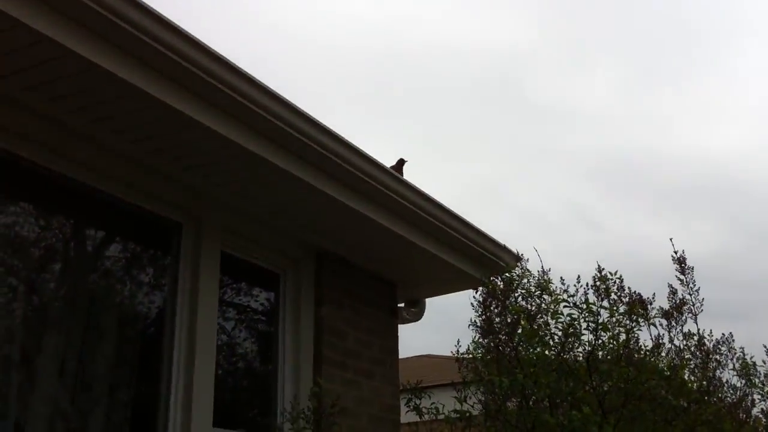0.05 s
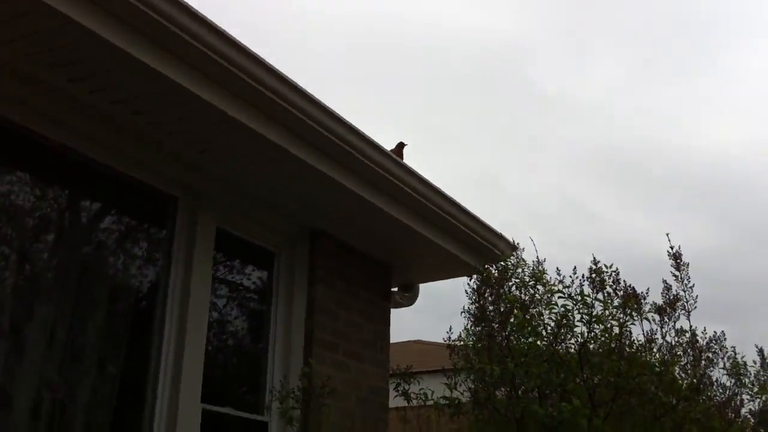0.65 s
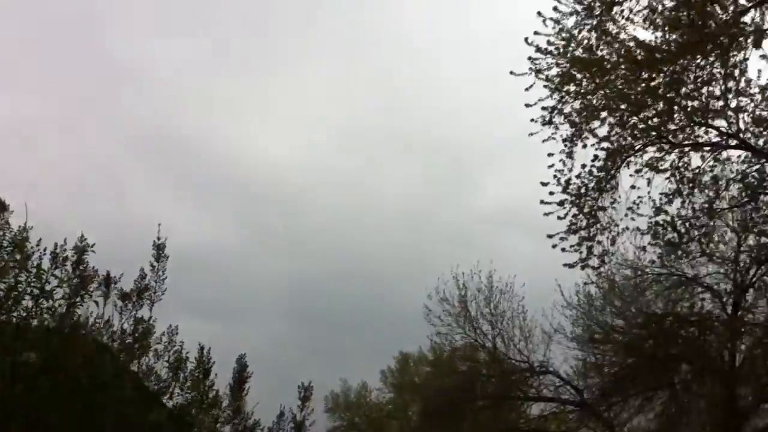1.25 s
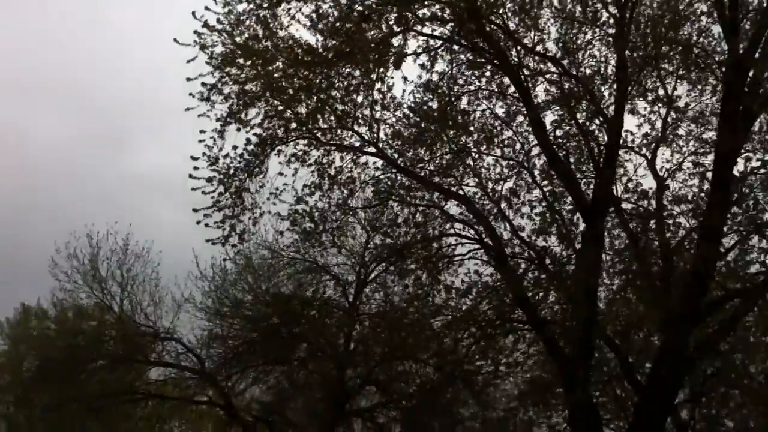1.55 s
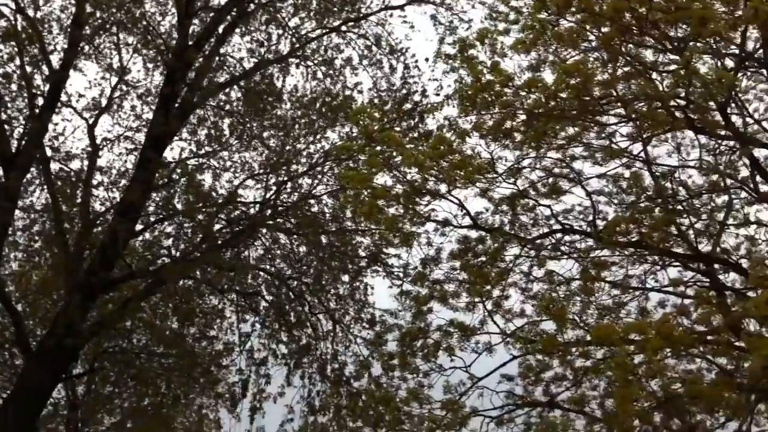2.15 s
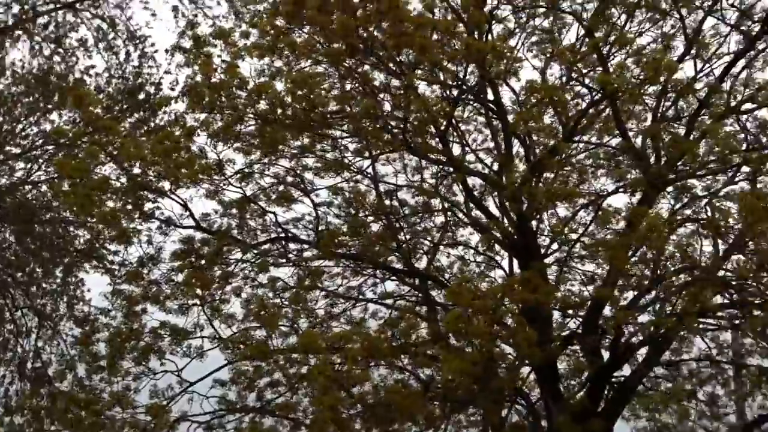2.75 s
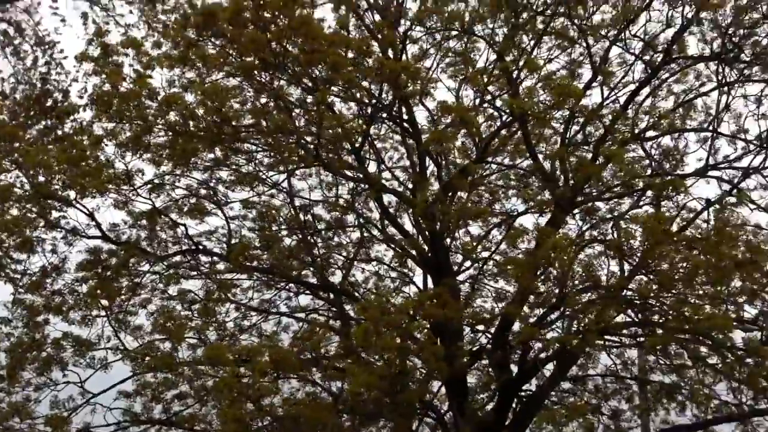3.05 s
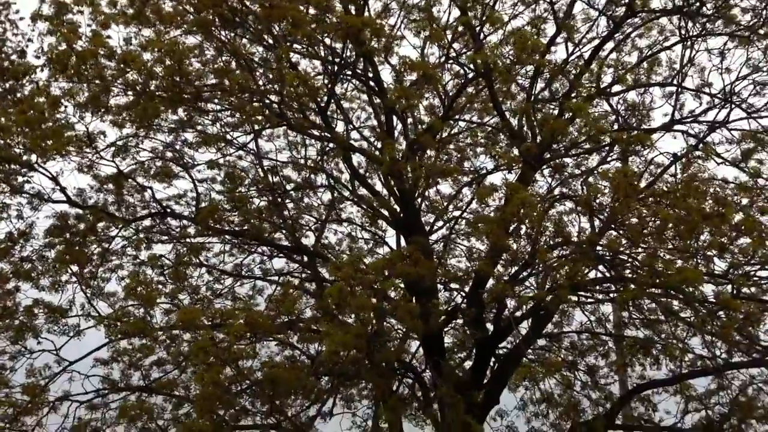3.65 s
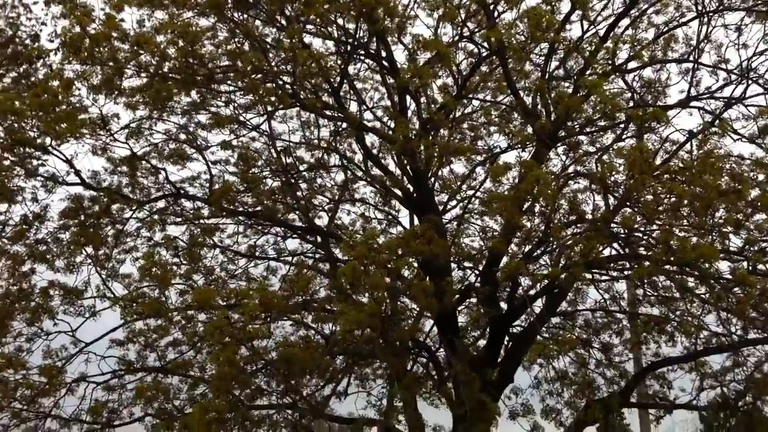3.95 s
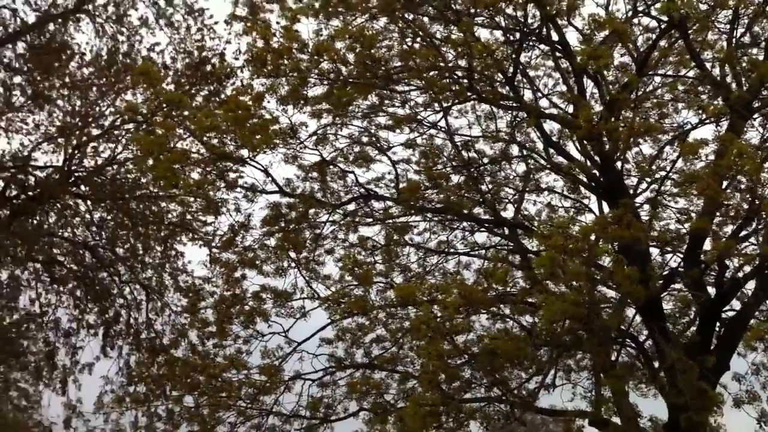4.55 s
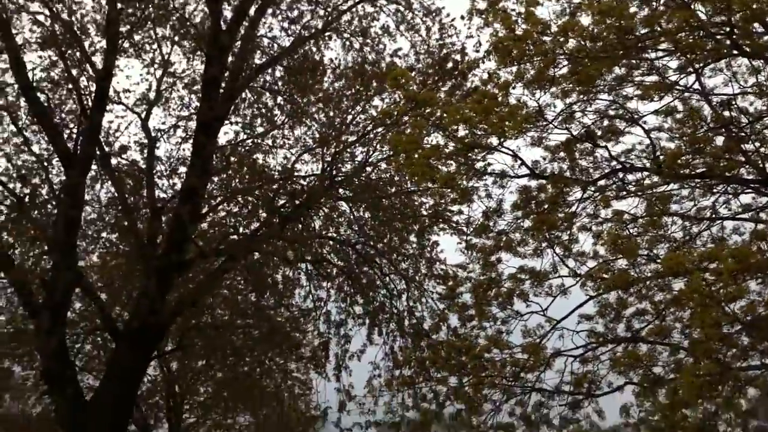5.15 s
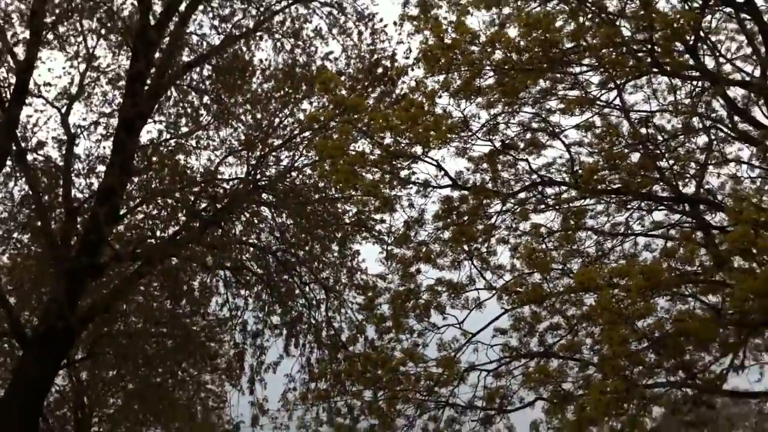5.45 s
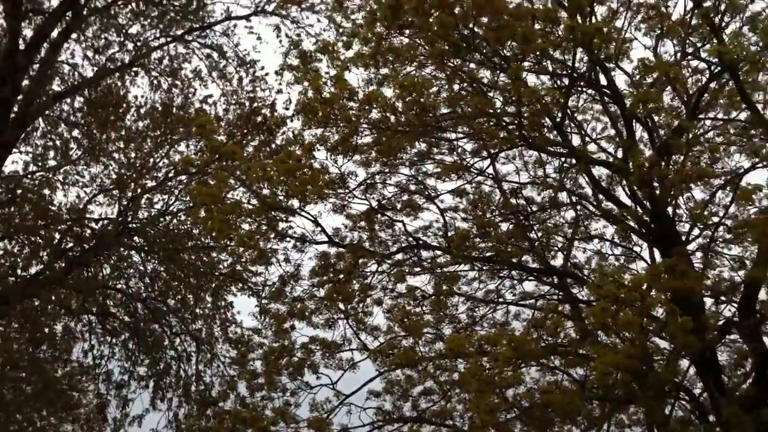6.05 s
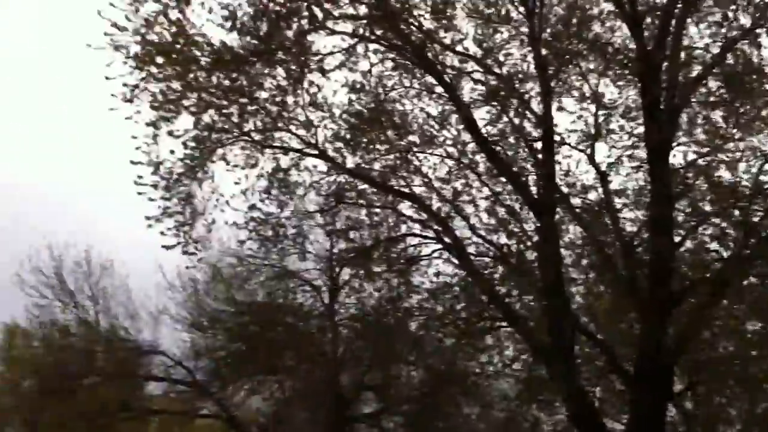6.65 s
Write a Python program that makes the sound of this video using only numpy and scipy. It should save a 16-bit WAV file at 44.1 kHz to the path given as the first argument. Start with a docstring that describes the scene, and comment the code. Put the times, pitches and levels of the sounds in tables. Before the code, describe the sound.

A robin repeats sharp alarm chirps outdoors while its higher-pitched mate answers from further off, over faint distant traffic.

```python
"""Robins scolding near their nest

One robin calls from a roof edge, its higher-pitched mate further off, a third far away in the trees.
The two sides of the syrinx sound together: each 'peek' starts with a rasp, sweeps up, holds, flicks and
drops, and soft clucks come in between. Walls and trees reflect the calls. Distant traffic washes behind,
a car draws nearer, and a finger ticks on the body of a hand-held camera."""
import sys
import numpy as np
from scipy import signal
from scipy.fft import rfft, irfft
from scipy.io import wavfile
from scipy.ndimage import uniform_filter1d

SR = 44100
rng = np.random.default_rng(int(sys.argv[2]) if len(sys.argv) > 2 else 0)


def transcribe(u):
    """Save the signal u as a 16-bit wav file named by the first command-line argument.

    u: samples, shape (n,) or (channels, n), limited to [-1, 1]; the rate is SR.
    q: integer samples, one column per channel.
    """
    v = np.clip(np.atleast_2d(u).T, -1, 1)
    q = np.round(v * 32767).astype(np.int16)
    wavfile.write(sys.argv[1], SR, q)


N = 303849

# spectrum of the outdoor wash: (frequency [Hz], relative density [dB])
WASH_SPECTRUM = [(22, -38), (42, -27), (65, -18), (120, -2), (190, 1), (350, -2.5), (850, 1.5), (1150, -2),
                 (1550, -8.5), (2050, -17), (2600, -23), (4000, -25), (7000, -32), (15500, -36)]
# droning bands of the traffic: (centre [Hz], width [Hz], level [dB])
DRONE_BANDS = [(158, 38, -73), (203.8, 9.1, -71.5), (860, 220, -68.5)]
# tyre whine of an approaching car: (time [s], level [dB])
TYRE_LEVELS = [(0, -70), (2.5, -70), (4.3, -58), (4.9, -54), (5.8, -54.5), (6.403, -52.5), (6.89, -55)]
# finger impacts: (time [s], level [dB])
FINGER_TICKS = [(1.123, -32.5), (1.133, -31), (1.153, -40)]
# modes of the camera body: (frequency [Hz], relative level [dB], decay time T60 [s])
BODY_MODES = [(1120, 8, 0.0084), (1760, 1, 0.019), (2500, -18, .007), (4200, -10, .005)]
# reflections from eaves, wall and ground, for two perches: (delay [s], gain [dB])
ROOF_REFLECTIONS = [(.0032, -23), (.0068, -23), (.0115, -23)]
MATE_REFLECTIONS = [(.0045, -17), (.018, -8), (.026, -17)]
# spectrum of the rasp with the beak open: (frequency [Hz], relative density [dB])
RASP_SPECTRUM = [(1200, -14), (2500, -1.5), (4700, 11.5), (7000, 5), (9500, -7), (12500, 2.5), (15500, -14)]
# overtones and combination tones of the two voices: (difference [dB], 2 x lower [dB], 3 x lower [dB],
# sum [dB], 2 x upper [dB], upper + difference [dB], lower + sum [dB])
CLUCK_PARTIALS = (-28, -32, -37, -42, -26, -30, -28)
MATE_PARTIALS = (-24.5, -26.5, -32, -9.5, -25, -51, -30)
ROOF_PARTIALS = (-21.5, -22, -17.5, -15, -16, -24.5, -20)
# vocal gesture of a peek: (stop time [s], glide() settings of each voice [Hz, s],
# effort() settings of each voice and of the rasp [dB, s])
MATE_GESTURE = dict( stop_s=.084, low_pitch=dict(top_hz=4258, rise_s=.033, sag_hz=34.6, sag_s=0.038),
                high_pitch=dict(top_hz=7130, rise_s=.033, sag_hz=136, sag_s=0.0284),
                low_level=dict(peak_db=2, attack_s=0.037, swell_db=20, fade_db=8.5, fade_s=0.029, bite_db=-8.5, snap_db=10),
                high_level=dict(peak_db=-8.5, attack_s=0.033, swell_db=8, fade_db=10.5, fade_s=0.039, bite_db=0.5, snap_db=1),
                rasp_level=dict(peak_db=-13.5, attack_s=0.033, swell_db=44, fade_db=27, fade_s=0.013, bite_db=4, snap_db=16))
ROOF_GESTURE = dict( stop_s=.079, low_pitch=dict(top_hz=3935, rise_s=.037, sag_hz=182.7, sag_s=0.0163),
                high_pitch=dict(top_hz=6437, rise_s=.033, sag_hz=368, sag_s=.047),
                low_level=dict(peak_db=-3.5, attack_s=0.056, swell_db=31, fade_db=10.5, fade_s=0.031, bite_db=2, snap_db=0.5),
                high_level=dict(peak_db=-13, attack_s=0.034, swell_db=17.5, fade_db=15.5, fade_s=0.031, bite_db=8.5, snap_db=8),
                rasp_level=dict(peak_db=-12.5, attack_s=0.016, swell_db=-5, fade_db=24, fade_s=0.021, bite_db=-3, snap_db=22.5))
# far peeks, soft clucks, the mate's peeks and the roof bird's peeks:
# (time [s], gain [dB], detuning [cents], length [ratio], brightness [dB])
FAR_CALLS = [(1.175, -59.5, 5, 0.97, -5), (4.725, -68, 88, 0.94, 4.5), (4.865, -59.5, 17, 0.71, -3.5)]
CLUCK_CALLS = [(.626, -59.5, -42, 0.83, -1), (.907, -59, -38, 1.04, -8), (4.328, -60, 55, 0.77, -1),
               (4.551, -60.5, 32, 0.84, -2.5), (4.796, -62, 38, 0.93, -2)]
MATE_CALLS = [(.272, -38.5, 8.5, 1.13, 2), (1.512, -37.5, 3, 1.05, 0.5), (2.385, -36.5, 10, 1.04, -0.5),
              (3.343, -36, -11, 0.97, -3), (3.897, -34.5, 1, 1, 2), (5.628, -37, -9, .97, 1)]
ROOF_CALLS = [(-.150, -29, -10.5, 1.15, -4), (.302, -25.5, 4, 0.98, 2.5), (1.268, -27, -1.5, 1.07, 1.5),
              (1.866, -26.5, -1.5, 1.033, 3.5), (2.468, -26.5, 0, 0.98, 4), (2.942, -27.5, 2, 1.03, 3.5),
              (3.367, -27, -3.5, 0.96, 4.5), (3.758, -26.5, -3.5, 1, 2.5), (5.026, -25, -1.5, 0.93, 2.5),
              (5.449, -29.5, -9.5, 1.04, -1.5), (6.034, -25.5, 0, 1.03, 4)]

FLICK_S, DROP_S, RELEASE_S = .0019, .00553, .019  # time scales of a peek's ending


def gain_of(db):
    """Amplitude ratio: tenfold for every 20 dB."""
    return 10 ** (np.asarray(db) / 20)


def unit_rms(x):
    """Normalisation to a mean power of one."""
    return x / np.sqrt(np.mean(x ** 2) + 1e-20)


def add(mix, start_s, sound):
    """Superposition: a sound joins the mix at start_s, which may be negative."""
    at = round(start_s * SR)
    sound = sound[max(-at, 0):]
    part = mix[max(at, 0):][:len(sound)]
    part += sound[:len(part)]


def noise(length, shape):
    """Spectral shaping: white noise weighted by shape(Hz), at unit rms."""
    white = rfft(rng.standard_normal(length))
    return unit_rms(irfft(white * shape(np.fft.rfftfreq(length, 1 / SR)), length))


def spectrum_gain(points, hz):
    """Interpolation of a (Hz, dB) spectrum over log frequency, as an amplitude."""
    point_hz, db = np.transpose(points)
    return gain_of(np.interp(np.log(hz + 1), np.log(point_hz + 1), db))


def bell(hz, centre_hz, octaves):
    """A Gaussian passband over log frequency."""
    return np.exp(-.5 * (np.log2((hz + 1) / centre_hz) / octaves) ** 2)


def bump(t, centre, width):
    """A Gaussian pulse in time."""
    return np.exp(-((t - centre) / width) ** 2)


def settle(t, from_s, over_s):
    """A Gaussian transition from 0 to 1, starting at from_s."""
    return 1 - bump(np.maximum(t, from_s), from_s, over_s)


def traffic(wash_db=-49, patchy_db=.82, whine_hz=1040, whine_octaves=.15):
    """Incoherent sources sum to noise: a broad wash, droning bands and the tyre whine of one car."""
    wash = gain_of(wash_db) * noise(N, lambda hz: spectrum_gain(WASH_SPECTRUM, hz))
    for centre, width, level_db in DRONE_BANDS:
        wash += gain_of(level_db) * noise(N, lambda hz: 1 / (1 + (2 * (hz - centre) / width) ** 2))
    whine_db = np.interp(np.arange(N) / SR, *np.transpose(TYRE_LEVELS))
    wash += gain_of(whine_db) * noise(N, lambda hz: bell(hz, whine_hz, whine_octaves))
    # the level wavers slightly in patches of frequency and time
    spectra = signal.stft(wash, SR, nperseg=1024, noverlap=768)[2]
    patches = uniform_filter1d(rng.standard_normal(spectra.shape), size=8, axis=0)
    patches = unit_rms(uniform_filter1d(patches, size=16, axis=1))
    return signal.istft(spectra * gain_of(patchy_db * patches), SR, nperseg=1024, noverlap=768)[1][:N]


def finger_ticks(rub_db=-23, rub_t60=.2):
    """Each impact excites the damped modes of the camera body; friction adds a brief rub."""
    out = np.zeros(N)
    t = np.arange(SR // 8) / SR
    ring = sum(gain_of(db - 60 * t / t60) * np.sin(2 * np.pi * hz * t) for hz, db, t60 in BODY_MODES)
    for start_s, db in FINGER_TICKS:
        rub = gain_of(rub_db - 60 * t / rub_t60) * noise(len(t), lambda f: bell(f, 1700, 1.44))
        add(out, start_s, gain_of(db) * (ring / abs(ring).max() + rub))
    return out


def yard(reflections, house_db, trees_db, echo_db, echo_s=.208, dull_hz=5200,
         eaves_db=-6, eaves_hz=2600, eaves_octaves=.44, splash_db=-11, splash_hz=12500):
    """Multipath propagation: the impulse response of direct sound, reflections and diffuse scatter."""
    t = np.arange(round(.8 * SR)) / SR

    def band_energy(tail, width_hz):
        """Energy scaling to that of a unit-gain passband of this width."""
        return tail / np.linalg.norm(tail) * np.sqrt(2 * width_hz / SR)

    def scatter(delay, t60, top_hz):
        """Dense reflections merge into low-passed noise that decays exponentially."""
        decay = (t > delay) * gain_of(-60 * abs(t - delay) / t60)
        diffuse = noise(len(t), lambda f: 1 / np.sqrt(1 + (f / top_hz) ** 4))
        return band_energy(diffuse * decay, top_hz)

    path = gain_of(house_db) * scatter(delay=.0029, t60=.29, top_hz=18000)
    path += gain_of(trees_db) * scatter(delay=.045, t60=1, top_hz=dull_hz)
    # a far house front returns a dull, smeared echo
    slap = np.sinc(2 * dull_hz * (t - echo_s)) * 2 * dull_hz / SR
    path += gain_of(echo_db) * (slap + gain_of(-5) * scatter(echo_s, t60=.18, top_hz=dull_hz))
    # the lowest notes spread widely from the beak and rattle briefly under the eaves
    eaves = noise(len(t), lambda f: bell(f, eaves_hz, eaves_octaves)) * gain_of(-60 * t / .2)
    path += gain_of(eaves_db) * band_energy(eaves, eaves_hz * eaves_octaves)
    # the treble splashes off the roof and the gutter
    splash = noise(len(t), lambda f: bell(f, splash_hz, 1)) * (t > .01) * gain_of(-60 * t / .072)
    path += gain_of(splash_db) * band_energy(splash, splash_hz / 2)
    path[0] += 1  # direct sound
    for delay, db in reflections:
        path[round(delay * rng.uniform(.96, 1.04) * SR)] += gain_of(db)  # the listener moves between calls
    return path


def cluck(length_s=.031, edge_hz=1230, top_hz=1866, voice_ratio=1.661, swell_db=3):
    """Joint frequency and amplitude modulation in one short arch: a cluck's course for syrinx()."""
    t = np.arange(0, length_s, 1 / SR)
    arch = np.sin(np.pi * t / length_s)
    low_hz = edge_hz + (top_hz - edge_hz) * arch
    arch_db = -swell_db * (1 - arch) ** 2
    low_db, high_db, rasp_db = arch_db + 7.5, arch_db + 7, arch_db - 10.5
    return t, low_hz, low_hz * voice_ratio, low_db, high_db, rasp_db, 1 - arch


def glide(t, stop_s, top_hz, rise_s, sag_hz, sag_s, sweep_from=.35, drop_to=.5, flick_share=.066):
    """Frequency modulation of one voice: it sweeps up, sags, flicks up at the stop and drops away."""
    sweep = sweep_from + (1 - sweep_from) * np.sin(np.pi / 2 * np.minimum(t / rise_s, 1))
    sag = sag_hz * settle(t, rise_s, sag_s)
    flick = 1 + flick_share * bump(t, stop_s, FLICK_S)
    drop = drop_to + (1 - drop_to) * np.exp(-np.maximum(t - stop_s, 0) / DROP_S)
    return (top_hz * sweep - sag) * drop * flick


def effort(t, stop_s, peak_db, attack_s, swell_db, fade_db, fade_s, bite_db, snap_db,
           release_db=33.5, accent_s=.0064):
    """Amplitude envelope in dB of a voice or the rasp: swell, fade and release, with two accents."""
    swell = max(swell_db, 0) * np.maximum(1 - t / attack_s, 0) ** 2
    fade = fade_db * settle(t, attack_s, fade_s)
    release = release_db * (np.maximum(t - stop_s, 0) / RELEASE_S) ** 2
    bite = bite_db * bump(t, .015, accent_s)  # during the sweep
    snap = snap_db * bump(t, stop_s + .0083, accent_s)  # during the drop
    return peak_db - swell - fade - release + bite + snap


def peek(stop_s, low_pitch, high_pitch, low_level, high_level, rasp_level):
    """Biphonation, two voices with separate pitches and levels: an alarm call's course for syrinx()."""
    t = np.arange(0, stop_s + RELEASE_S, 1 / SR)
    pitches = [glide(t, stop_s, **rule) for rule in (low_pitch, high_pitch)]
    levels = [effort(t, stop_s, **rule) for rule in (low_level, high_level, rasp_level)]
    closing = settle(t, stop_s - FLICK_S, DROP_S)  # beak open at 0, shut at 1
    return t, *pitches, *levels, closing


def syrinx(course, partials_db, pitch, length, bright_db, jitter=.0023, rasp_jitter=.043,
           closing_jitter=.097, flutter=.039, top_flutter=.29, top_growth=.4, colour_spread_db=2):
    """Nonlinear coupling: the two sides of the syrinx sound together and breed combination tones."""
    times, *curves = course
    t = np.arange(0, times[-1] * length, 1 / SR)
    low_hz, high_hz, low_db, high_db, rasp_db, closing = (np.interp(t, times * length, c) for c in curves)

    def tremble(depth):
        """Random modulation about one, mostly below 500 Hz."""
        return 1 + depth * noise(len(t), lambda f: 1 / (1 + (f / 500) ** 2))

    # the pitch breaks up with the rasp and as the beak closes
    unsteady = jitter + rasp_jitter * gain_of(rasp_db) + closing_jitter * closing
    low, high = (2 * np.pi * (np.cumsum(hz * pitch * tremble(unsteady)) / SR + rng.random())
                 for hz in (low_hz, high_hz))  # phases of the two voices
    low_gain = gain_of(low_db) * tremble(flutter)
    high_gain = gain_of(high_db + bright_db) * tremble(flutter)
    colour_db = np.add(partials_db, colour_spread_db * rng.standard_normal(len(partials_db)))
    beat, low_double, low_triple, summed, high_double, high_beat, low_summed = gain_of(colour_db)
    voice = low_gain * (np.sin(low) + beat * np.sin(high - low) + low_double * np.sin(2 * low))
    # the top tones follow the upper voice, grow in bright calls and go as the beak closes
    top = summed * np.sin(low + high) + high_double * np.sin(2 * high)
    top += high_beat * np.sin(2 * high - low) + low_summed * np.sin(2 * low + high)
    top += low_triple * np.sin(3 * low)
    top_gain = gain_of(top_growth * bright_db) * (1 - closing) * tremble(top_flutter)
    voice += high_gain * (np.sin(high) + top_gain * top)
    puffs = 1 + np.sin(2 * low - high)  # the rasp pulses at a combination frequency of the voices
    rasp = (1 - closing) * noise(len(t), lambda f: spectrum_gain(RASP_SPECTRUM, f))
    rasp += closing * noise(len(t), lambda f: bell(f, 3400, .57))  # husky once the beak shuts
    voice += gain_of(rasp_db + bright_db) * unit_rms(puffs * rasp) / np.sqrt(2)
    fades = np.minimum(t / .011, 1) * np.minimum(t[::-1] / .003, 1)
    return np.sqrt(2) * voice * fades


def robin(calls, course, partials_db, reflections, house_db, trees_db, echo_db):
    """Source and path: each call is convolved with its own impulse response of the yard."""
    out = np.zeros(N)
    for start_s, db, cents, length, bright_db in calls:
        call = gain_of(db) * syrinx(course, partials_db, 2 ** (cents / 1200), length, bright_db)
        path = yard(reflections, house_db, trees_db, echo_db)
        add(out, start_s, signal.fftconvolve(call, path))
    return out


def scene():
    """Superposition of the robins, the traffic and the finger ticks in one channel."""
    roof_peek, mate_peek = peek(**ROOF_GESTURE), peek(**MATE_GESTURE)
    roof = robin(ROOF_CALLS, roof_peek, ROOF_PARTIALS, ROOF_REFLECTIONS,
                 house_db=-15, trees_db=-22.5, echo_db=-27)
    mate = robin(MATE_CALLS, mate_peek, MATE_PARTIALS, MATE_REFLECTIONS,
                 house_db=-11, trees_db=-18.5, echo_db=-30)
    clucks = robin(CLUCK_CALLS, cluck(), CLUCK_PARTIALS, MATE_REFLECTIONS,
                   house_db=-3, trees_db=-32, echo_db=-26)
    far = robin(FAR_CALLS, roof_peek, ROOF_PARTIALS, MATE_REFLECTIONS,
                house_db=2, trees_db=6.5, echo_db=-18)
    return (roof + mate + clucks + far + traffic() + finger_ticks())[None]


def record(dry, cutoff_hz=15780):
    """Band limiting: a linear-phase low-pass filter removes the highest treble."""
    lowpass = signal.firwin(511, cutoff_hz, window=("kaiser", 9), fs=SR)
    return signal.oaconvolve(dry, lowpass[None], "same")


dry = scene()
out = record(dry)
transcribe(out)
```